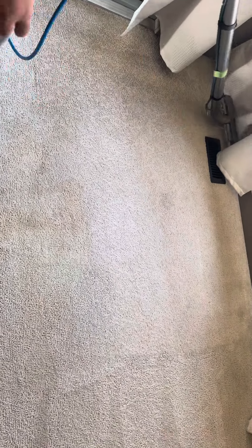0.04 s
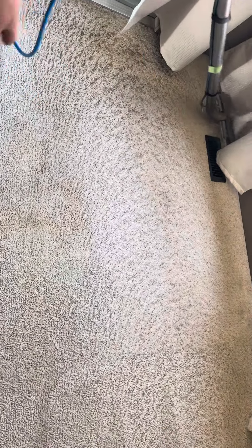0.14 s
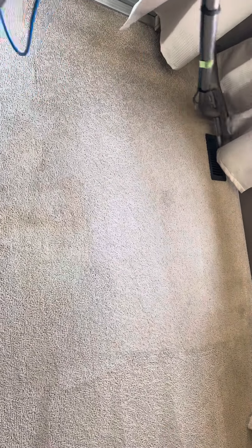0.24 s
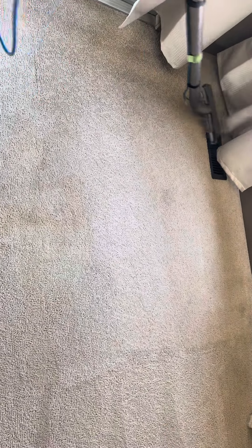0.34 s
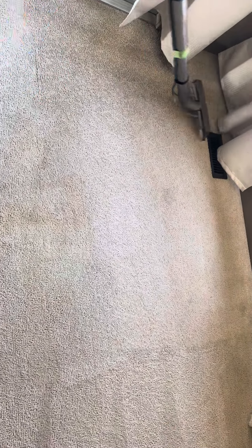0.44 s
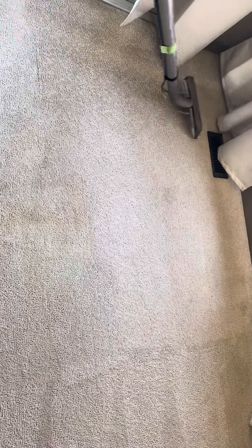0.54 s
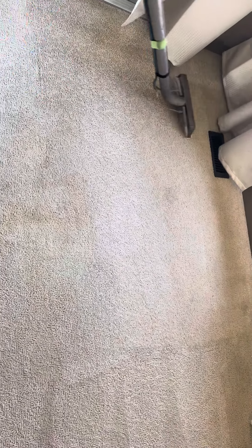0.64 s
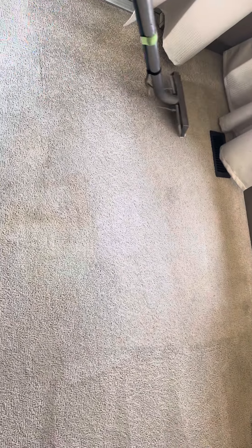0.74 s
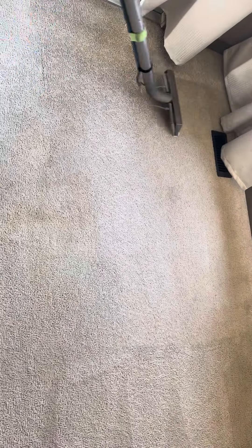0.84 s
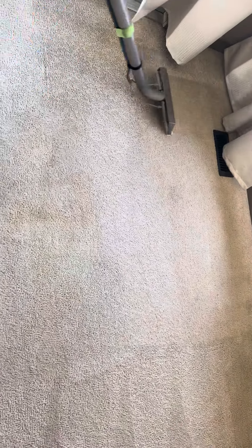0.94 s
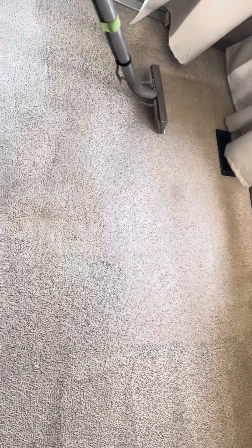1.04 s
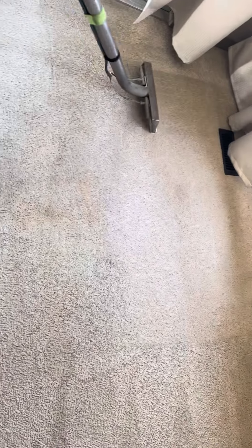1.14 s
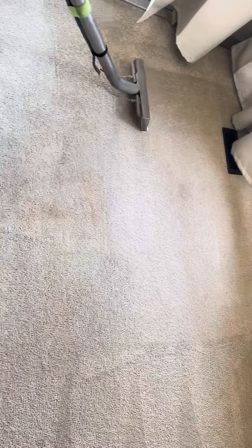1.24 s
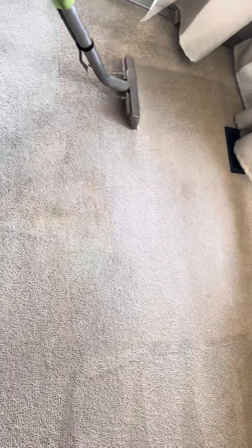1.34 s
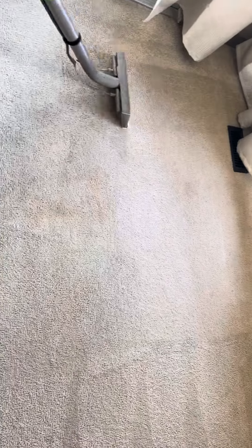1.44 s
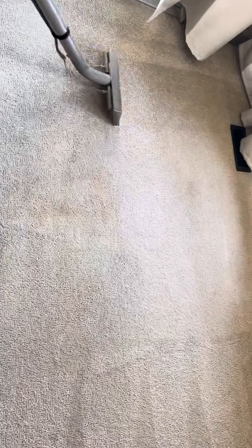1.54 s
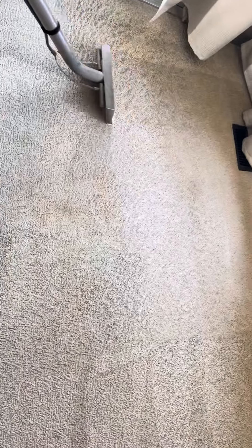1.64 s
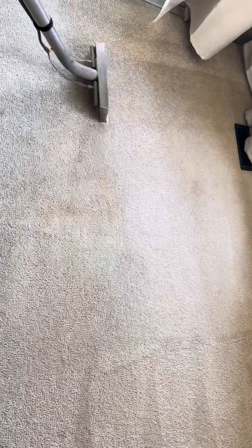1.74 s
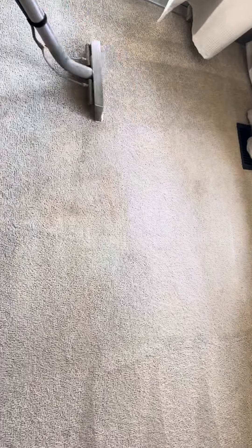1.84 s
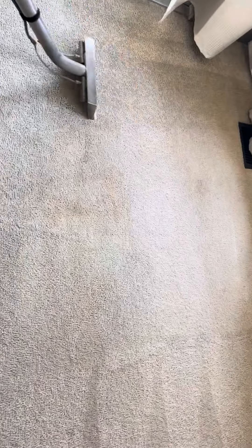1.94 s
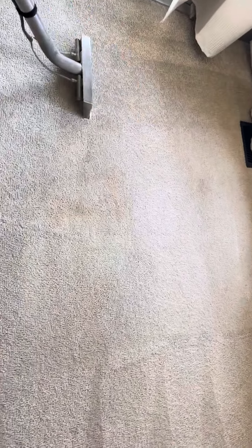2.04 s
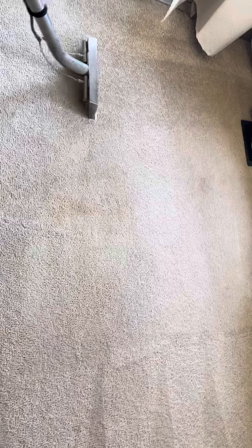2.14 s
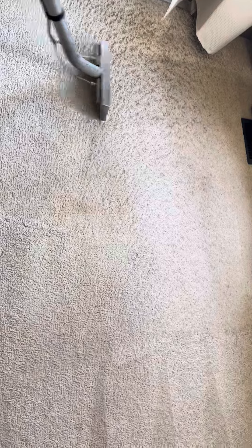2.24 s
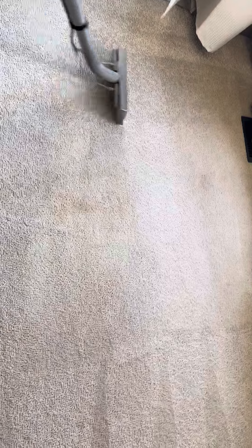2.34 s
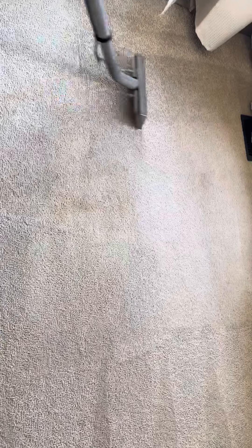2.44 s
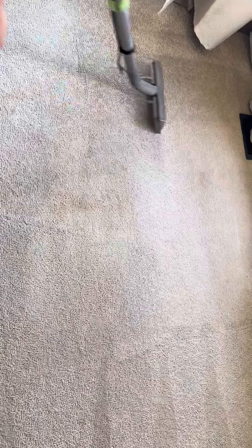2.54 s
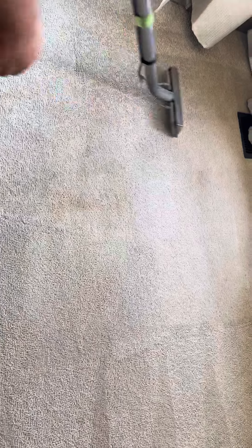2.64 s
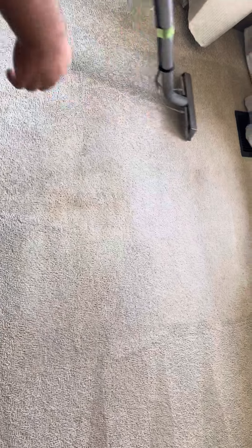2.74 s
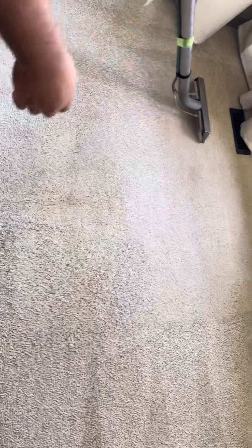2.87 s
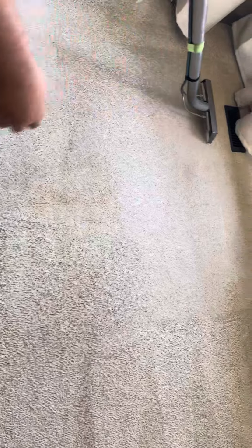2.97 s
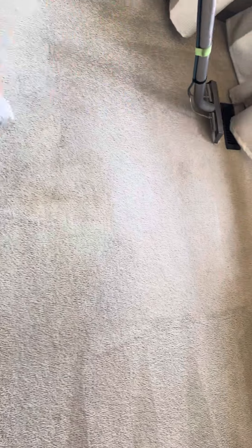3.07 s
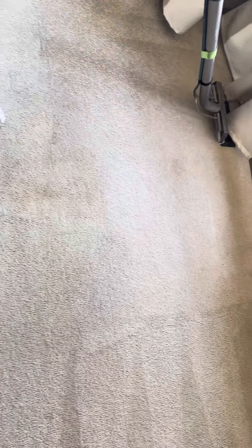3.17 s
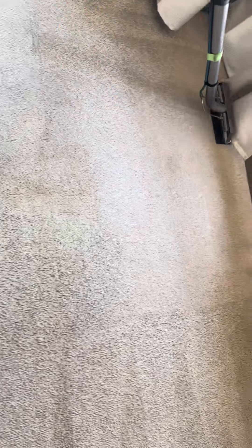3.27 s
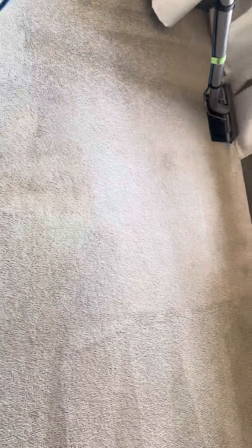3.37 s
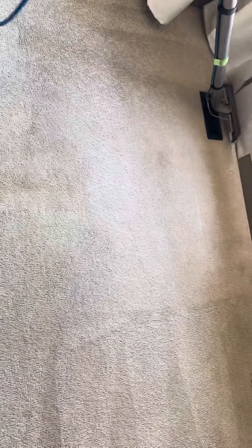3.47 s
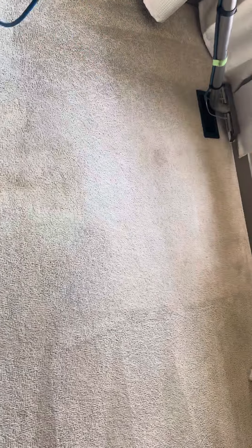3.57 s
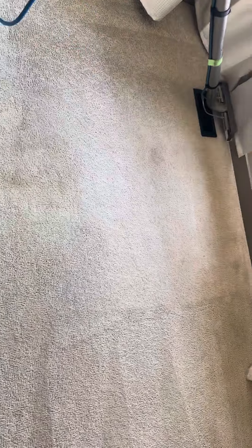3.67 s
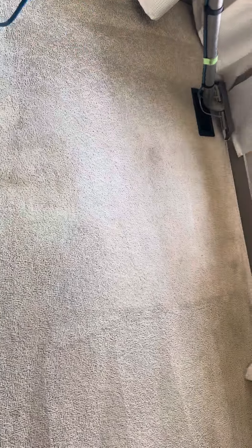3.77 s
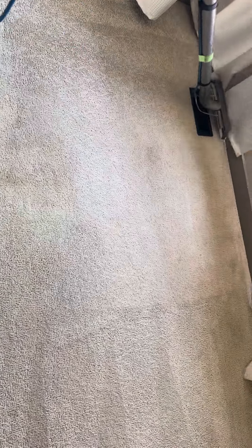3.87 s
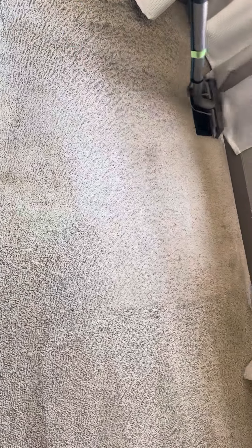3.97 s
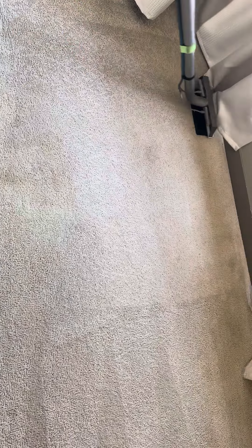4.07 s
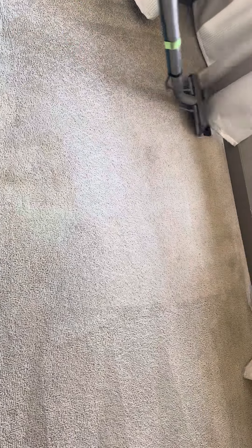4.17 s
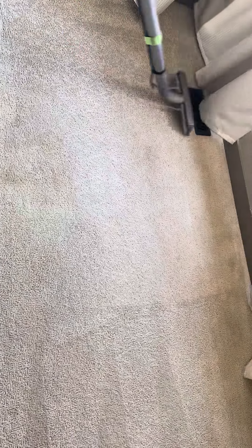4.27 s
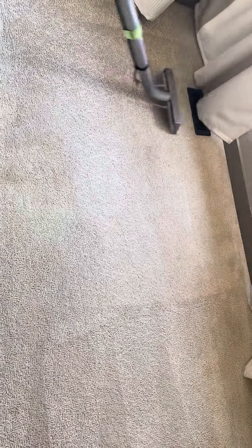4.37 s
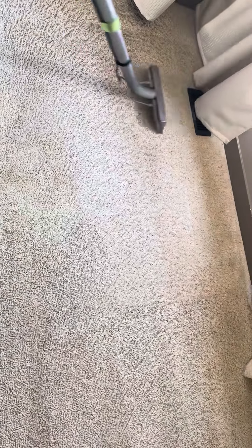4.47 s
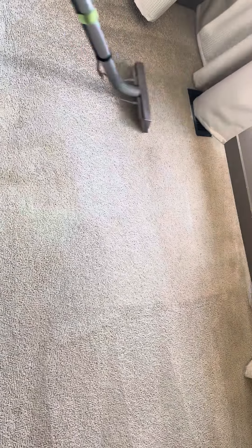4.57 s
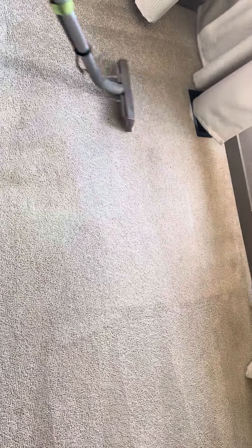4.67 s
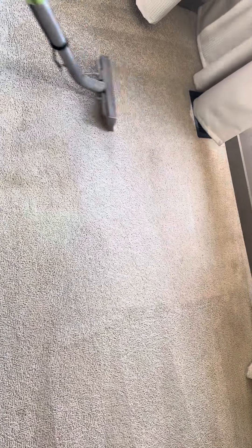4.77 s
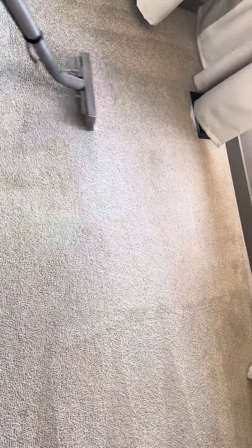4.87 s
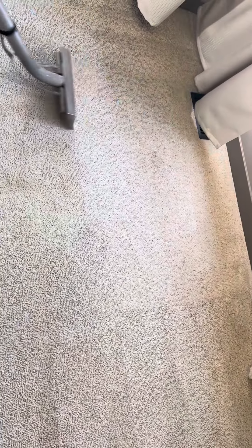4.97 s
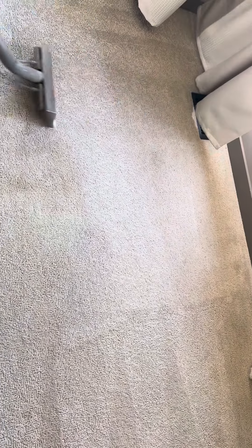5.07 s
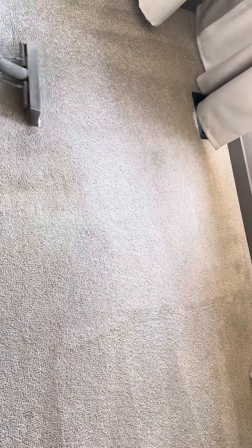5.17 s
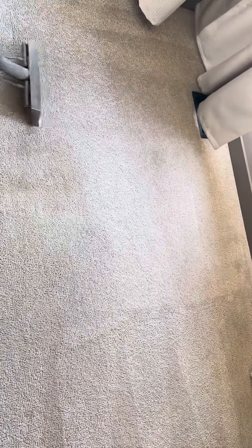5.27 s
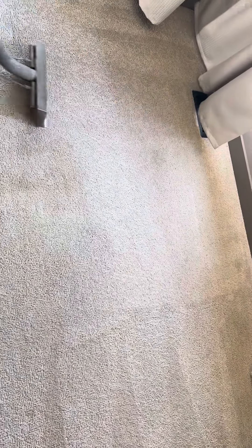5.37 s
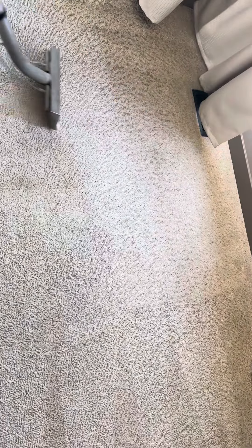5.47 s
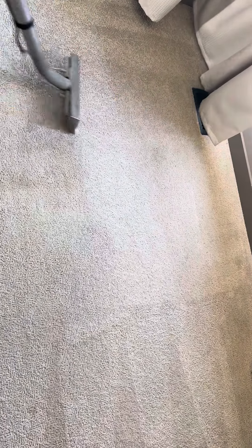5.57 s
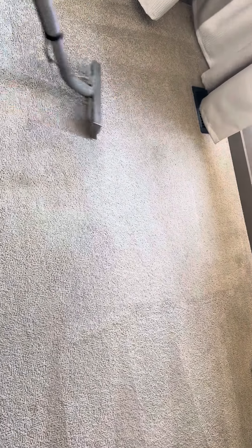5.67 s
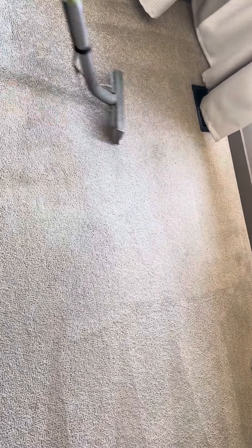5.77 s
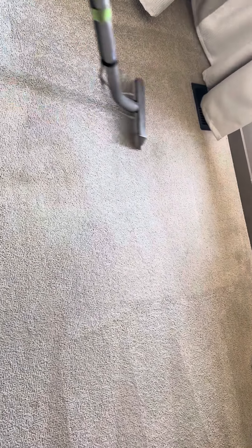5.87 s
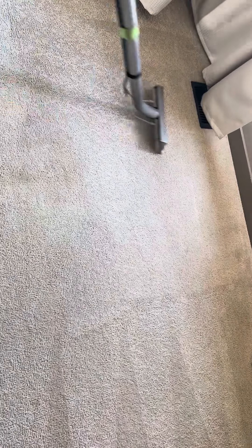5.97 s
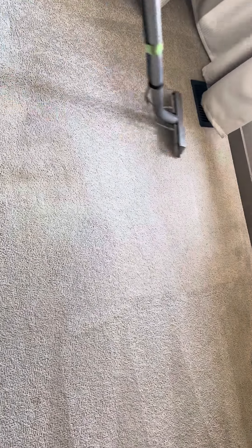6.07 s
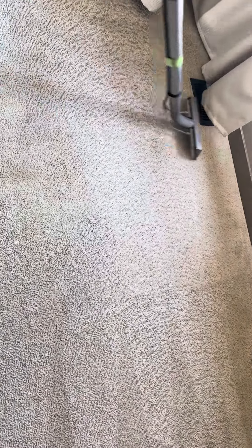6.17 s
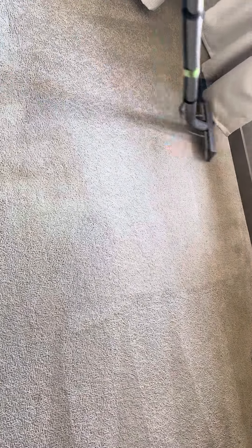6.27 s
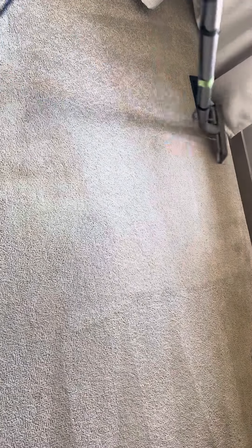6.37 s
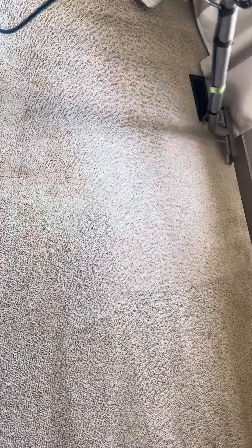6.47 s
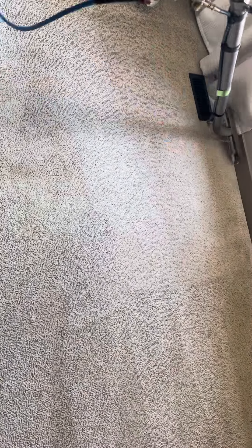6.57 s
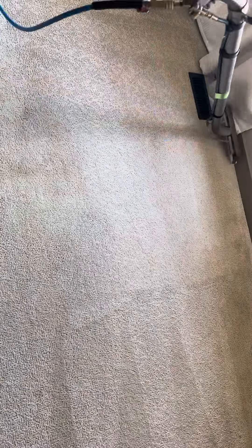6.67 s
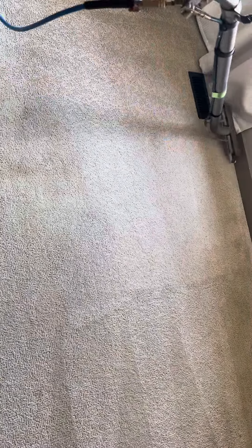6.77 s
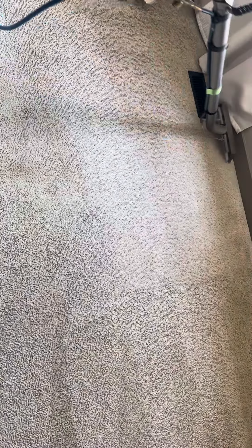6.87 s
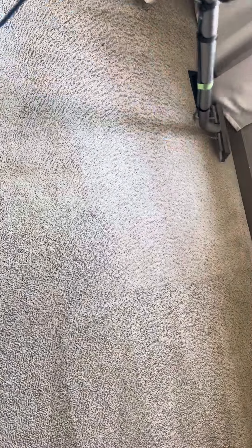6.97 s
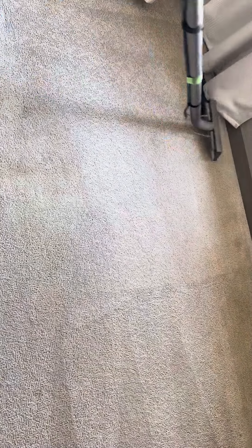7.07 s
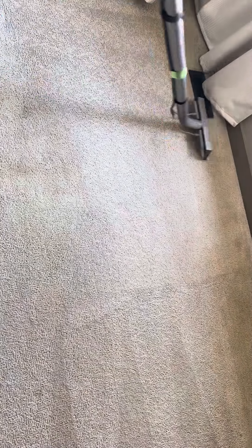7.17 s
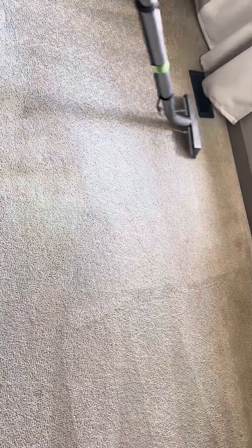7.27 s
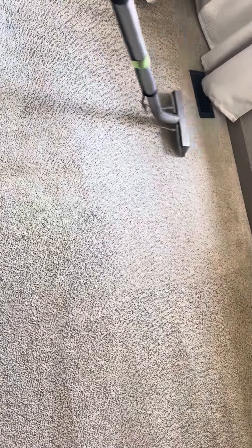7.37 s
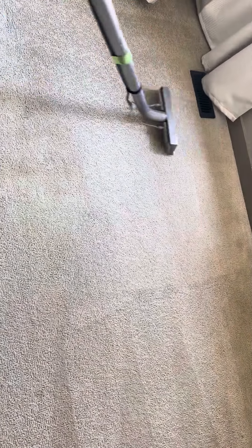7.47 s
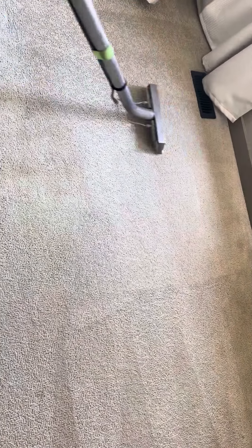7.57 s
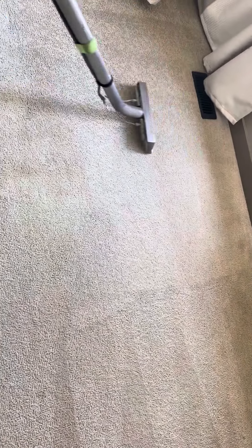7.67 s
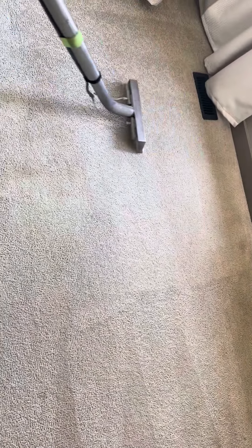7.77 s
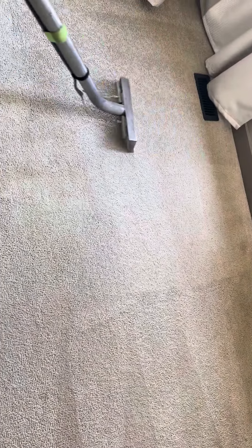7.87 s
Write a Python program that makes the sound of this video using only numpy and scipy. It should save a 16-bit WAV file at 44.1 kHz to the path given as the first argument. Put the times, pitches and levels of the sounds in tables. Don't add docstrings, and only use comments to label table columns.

```python
import sys
import numpy as np
from scipy import signal
from scipy.fft import rfft, irfft, next_fast_len
from scipy.io import wavfile
from scipy.ndimage import uniform_filter1d

SR = 44100
rng = np.random.default_rng(int(sys.argv[2]) if len(sys.argv) > 2 else 0)


def amp(db):
    return 10 ** (np.asarray(db, float) / 20)


def write(x):
    x = np.atleast_2d(x).T
    wavfile.write(sys.argv[1], SR, np.round(np.clip(x, -1, 1) * 32767).astype(np.int16))


N = 349272

# start [s], length [s], level [dB], boom of the hollow head [Hz],
# rasp above the boom [dB].
SCUFFS = [(0.247, 0.138, -30, 274, 2.5), (2.2, .17, -34.5, 350, -10), (2.4, 0.188, -33.5, 180, -5),
          (2.66, 0.21, -40, 190, -6), (3.136, .06, -30, 165, -26), (3.189, 0.098, -21.5, 227, -4),
          (3.293, 0.063, -24.5, 302, -9), (3.527, 0.037, -24, 161, -2), (3.836, 0.083, -34, 249, 4.5),
          (4.036, 0.045, -23.5, 231, -11), (4.074, 0.13, -30.5, 267, 1), (4.208, 0.081, -29, 153, -3),
          (4.505, 0.058, -26.5, 168, -20), (4.854, .2, -28.5, 191, -9), (5.087, 0.13, -27, 156, -16),
          (5.22, .08, -32, 170, -18), (5.616, 0.099, -29, 166, -18), (5.797, 0.19, -31.5, 221, -15),
          (6.259, 0.14, -25.5, 250, -3.5), (6.4, .045, -29, 220, -24), (6.518, 0.052, -24.5, 210, -0.5),
          (6.556, 0.091, -26, 440, 1), (6.999, .19, -31, 235, 1.5), (7.486, .11, -34, 152, -2)]
# time [s], notch where the floor echo cancels the jets [Hz], how far the port sum is
# spared from thinning above 8.2 kHz [dB], nearness [dB].
WAND_POSE = [(0, 12000, -1.5, -3), (.6, 11600, 0, -1.5), (1.1, 14400, -2.5, 0), (1.5, 12500, -3.5, 2),
             (1.9, 11200, -5, 3.5), (2.1, 10950, 4, 4), (3, 12000, 2, -0.5), (3.3, 12000, -2.5, -1.5),
             (3.5, 12000, 5, -1.8), (4, 12500, 4, -3), (4.3, 13500, -5, -3.5), (4.6, 14500, -2.5, -1),
             (5, 12000, -4, 2), (5.5, 13000, -2.5, 3), (5.95, 12600, 0, -.4), (6.8, 12300, 0.3, -1.4),
             (7.3, 12500, -3, -.4), (7.92, 12000, -4, 1.5)]


def evened(x):
    return x / np.sqrt(np.mean(x ** 2) + 1e-20)


def steadied(x):
    power = abs(uniform_filter1d(np.atleast_2d(x).mean(0) ** 2, size=3000))
    return x / np.sqrt(power + 1e-9)


def curve(rows, index):
    rows = np.array(rows)
    return np.interp(np.arange(N) / SR, rows[:, 0], rows[:, index])


def gated(starts, ends, heights, rise_s, fall_s):
    t = np.arange(0, N / SR, 0.001)
    total = np.zeros(len(t))
    for start, end, height in zip(starts, ends, heights):
        full = start + rise_s
        release = max(end, full)
        total += height * np.interp(t, [start, full, release, release + fall_s], [0, 1, 1, 0])
    return np.interp(np.arange(N) / SR, t, total)


def dug(db):
    start, length = np.transpose(SCUFFS)[:2]
    rise_s, ease_s = 0.0094, 0.02
    return gated(start, start + length - ease_s / 2, amp(db), rise_s, ease_s)


def resonate(x, hz, width_hz):
    turn = np.exp(2j * np.pi * np.cumsum(hz) / SR)
    r = np.exp(-np.pi * width_hz / SR)
    return 2 * (turn * signal.lfilter([1 - r], [1, -r], x * turn.conj())).real


def turbulence(colour, patchy_db, flicker_db, size=1024):
    hop = size // 4
    frames, hz = N // hop + 5, np.fft.rfftfreq(size, 1 / SR)
    f, *columns = np.transpose(colour)
    sum_db, diff_db, link = (np.interp(np.log(hz + 1), np.log(f), c, *edge)[:, None]
                             for c, edge in zip(columns, [(-99, -99), (-99, -99), ()]))
    a, b, c, d, patches = np.ascontiguousarray(rng.standard_normal((frames, len(hz), 5)).T)
    patches = uniform_filter1d(patches, size=14, axis=0)
    patches = evened(uniform_filter1d(patches, size=12, axis=1))
    gusts = evened(uniform_filter1d(rng.standard_normal(frames), size=10))
    link = np.clip(link, -1, 1)
    diff = 1j * link * (a + 1j * b) + np.sqrt(1 - link ** 2) * (c + 1j * d)
    z = np.array([(a + 1j * b) * amp(sum_db), diff * amp(diff_db)])
    z = z * amp(patchy_db * patches + flicker_db * gusts)
    mid, side = signal.istft(z, nperseg=size, noverlap=size - hop)[1][:, :N]
    return np.array([mid + side, mid - side]) / np.sqrt(np.mean(mid ** 2))


def spray():
    # frequency [Hz], port sum [dB], port difference [dB],
    # share of the difference that is the delayed sum [-1 to 1].
    jets_colour = [(4200, -22, -20, 0), (5300, -8, -14, -.3), (6000, -1, -11, -.6), (7000, 0, -3, -.8),
                   (7800, 0, -1, -.8), (8500, -4, -2, -.75), (9200, -8, -4, -.8), (10000, -10, -3, -.7),
                   (10600, -16, -2.5, -.6), (13300, -18, -3.5, .5), (14100, -11, -4, .6),
                   (15100, -8.5, -5, .7), (16500, -8, -7, .6)]
    rush_colour = [(935, 4, -15, 0), (1190, -0.5, -2, .1), (1800, 0, -8, .1), (2200, 0.5, 0, -.1),
                   (2840, 1, 3.5, -0.54), (3560, 0.5, -0.5, -.3), (4350, -1.5, 1, -0.25),
                   (4530, 1, 1.5, -0.054), (6130, -4.5, -3.5, -.3), (7750, -18, -13.5, -.5),
                   (12000, -65, -15.5, 0)]
    # start [s], end [s], share shut [0-1].
    trigger_shut = [
        (3.363, 4.015, 0.39),
        (3.41, 4.022, 0.41),
        (3.496, 3.898, 0.08),
        (4.067, 4.163, 0.32),
        (6.598, 6.76, 0.12),
    ]
    # start [s], length [s], level [dB].
    gulps = [
        (0.212, 0.18, 3.5),
        (1.497, 0.054, 1),
        (3.174, 0.16, 3),
        (4.033, 0.043, 1.5),
        (4.157, 0.048, 4),
        (5.12, .04, 0),
        (6.532, .07, 0.5),
        (6.82, 0.053, 2),
        (6.925, .25, 1.7),
    ]
    near_db = curve(WAND_POSE, index=3)
    shut = gated(*np.transpose(trigger_shut), rise_s=0.06, fall_s=0.017)
    start, length, db = np.transpose(gulps)
    fall_s = 0.028
    gulp_db = gated(start, start + length - fall_s / 2, db, 0.025, fall_s)

    jets_db = -29 + near_db - 5 * shut + 0.78 * gulp_db
    jets = amp(jets_db) * turbulence(jets_colour, patchy_db=0.78, flicker_db=0.35)
    whistle = amp(0.1 - 0.63 * near_db - 9.5 * shut) - 1
    whistling = whistle * resonate(jets, np.full(N, 6150.), width_hz=1100)
    echo_notch = 0.25 * resonate(jets, curve(WAND_POSE, index=1), width_hz=1000)
    jets = jets + whistling - echo_notch

    rush_db = -32.56 + 0.3 * near_db - 10 * shut + gulp_db
    return jets + amp(rush_db) * turbulence(rush_colour, patchy_db=1.12, flicker_db=0.47)


def drag():
    # time [s], weight of the head on the pile [dB].
    head_weight = [(0, -33.5), (1.4, -33), (2.1, -34), (2.55, -33), (3.15, -31.5), (3.6, -33.5), (4.1, -33),
                   (4.85, -32.5), (5.25, -35), (5.8, -31.5), (6.4, -32.5), (7.15, -33), (7.92, -32)]
    # frequency [Hz], port sum [dB], port difference [dB],
    # share of the difference that is the delayed sum [-1 to 1].
    scrape_colour = [(150, -2.5, -36, 0), (250, 1, -17.5, -.1), (372, 0.5, -6.5, -.2), (543, -4, -3.5, -.1),
                     (616, -1.5, -1.5, .2), (790, 0, -3, .2), (1020, -4, -3.5, 0), (1480, -11, -14, 0),
                     (2463, -13, -19, 0)]
    rumble_colour = [(20, -42, -72, 0), (35.4, -42, -52, 0), (56, 3, -42, 0), (81, 4, -44, 0),
                     (101, -4.5, -55, 0), (130, 5.5, -44, 0), (198, -4, -14, 0), (281, -8, -15, 0),
                     (441, -32, -25, 0)]
    judder = amp(0.5 * evened(uniform_filter1d(rng.standard_normal(N), size=400)))
    scrape = amp(curve(head_weight, index=1) - 0.58)
    scrape = scrape * turbulence(scrape_colour, patchy_db=1.04, flicker_db=-1.05)
    shaken = amp(-40.5) + dug(np.transpose(SCUFFS)[2] - 17)
    rumble = shaken * turbulence(rumble_colour, patchy_db=2.0, flicker_db=-0.9, size=2048)
    return judder * scrape + rumble


def blower():
    # frequency [Hz], level [dB], wavering width [Hz], steady share [0-1].
    hum_tones = [(59, -48, 13, 0.2), (123, -37, 23, 0.5), (194.7, -41, 9.4, .35), (259, -45, 18, 0),
                 (366.4, -46, 16, 0.2), (535, -54.5, 18, 0.04), (791, -49, 150, 0)]
    held = 0.3
    size = next_fast_len(N)
    t, f, out = np.arange(N) / SR, np.fft.rfftfreq(size, 1 / SR), np.zeros(N)
    flow = rfft(rng.standard_normal(size))
    for hz, db, width_hz, clean in hum_tones:
        smeared = evened(irfft(flow / (1 + (2 * (f - hz) / width_hz) ** 2), size)[:N])
        steady = np.sqrt(2) * np.sin(2 * np.pi * (hz * t + rng.random()))
        tone = evened((1 - clean) * smeared + clean * steady)
        out += amp(db - 2.0) * ((1 - held) * tone + held * steadied(tone))
    return out


def scuffs():
    # frequency [Hz], port sum [dB], port difference [dB],
    # share of the difference that is the delayed sum [-1 to 1].
    rasp_colour = [(250, -36, -25, 0), (447, 4, -1, 0.0047), (590, 0.5, 4, 0.0055), (800, -0.5, -4.5, 0),
                   (1070, 2, 1, 0), (1390, -9.5, -13, 0), (3120, -22, -15, 0)]
    start, length, db, boom_hz, rasp_db = np.transpose(SCUFFS)
    slips = amp(1.6 * evened(uniform_filter1d(rng.standard_normal(N), size=250)))
    hz = np.interp(np.arange(N) / SR, start + length / 2, boom_hz)
    boom = resonate(slips * rng.standard_normal(N), hz, width_hz=120)
    boom = steadied(resonate(boom, hz, width_hz=120))
    rasp = slips * turbulence(rasp_colour, patchy_db=4.0, flicker_db=3.0)
    tube_hz = 760 + 0.3 * (hz - hz.mean())
    rasp = steadied(rasp + resonate(rasp, tube_hz, width_hz=110))
    return dug(db - 4.5) * boom + dug(db + rasp_db - 4.0) * rasp


def bumps():
    # time [s], peak [dB], thud [Hz], t60 [s], knock above the thud [dB].
    head_bumps = [(0.404, -16, 151, 0.1, -16), (0.474, -25, 131, 0.11, -16), (3.144, -17, 130, 0.1, -28),
                  (3.204, -15, 80.7, 0.09, -13), (3.532, -17.5, 164, 0.073, -6),
                  (3.88, -29, 117, 0.065, -5), (3.552, -19, 150, .07, -7), (4.209, -18, 116, 0.055, -11),
                  (4.228, -19, 100, .08, -16), (4.961, -26.5, 125, .2, -20), (5.061, -23, 121, .2, -18),
                  (6.261, -13.5, 250, 0.097, -21), (6.523, -12.5, 235, 0.066, -7),
                  (6.548, -17, 135, 0.1, -8)]
    t, out = np.arange(8000) / SR, np.zeros((2, N + 8000))
    knock_band = signal.butter(2, [250, 1500], "band", fs=SR, output="sos")
    knocks = signal.sosfilt(knock_band, rng.standard_normal((len(head_bumps), 3, len(t))))
    for (s, db, hz, t60_s, knock_db), knock in zip(head_bumps, knocks):
        thud = np.sin(2 * np.pi * hz * t * (1 - 2.9 * t))
        thud = thud * amp(-60 * t / t60_s) * (1 - np.exp(-t / 0.005))
        knock = evened(knock[0] + 0.7 * knock[1:])
        knock = knock * amp(knock_db - 60 * t / 0.06)
        out[:, round(s * SR):][:, :len(t)] += amp(db) * (thud + knock)
    return out[:, :N]


def scene():
    return spray() + drag() + scuffs() + blower() + bumps()


def masked(x, margin_db, unsure_db, hole_db):
    size, overlap = 2048, 1536
    hz, t, z = signal.stft([x[0] + x[1], x[0] - x[1]], SR, nperseg=size, noverlap=overlap)
    band = np.where(hz < 6890, hz // 345, 10 + hz // 689).astype(int)
    power = uniform_filter1d(abs(z) ** 2, size=4, axis=2)
    starts, widths = np.unique(band, return_index=True, return_counts=True)[1:]
    level = np.add.reduceat(power, starts, axis=1) / widths[:, None] + 1e-20
    luck = evened(uniform_filter1d(rng.standard_normal(level.shape), size=5, axis=2))[:, band]
    top = hz[:, None] > 8200
    under_db = 10 * np.log10(level[::-1] / level)[:, band] + unsure_db * (1 + top) * luck
    under_db[0] -= np.interp(t, *np.transpose(WAND_POSE)[[0, 2]]) * top
    loudest = np.sqrt(level * np.maximum(level, level[::-1]))[:, band]
    above_hole = uniform_filter1d(power, size=3, axis=1) > loudest * amp(-2 * hole_db)
    kept = (under_db < margin_db) & above_hole
    z = z * (kept | (hz[:, None] < 1700))
    mid, side = signal.istft(z, SR, nperseg=size, noverlap=overlap)[1][:, :N]
    return np.array([mid + side, mid - side]) / 2


def top_cut(x):
    return signal.sosfilt(signal.butter(12, 17100, fs=SR, output="sos"), x)


def record(dry):
    cut = signal.sosfilt(signal.butter(3, 33, "high", fs=SR, output="sos"), dry)
    lowpass = signal.firwin(1023, 15730, window=("kaiser", 10), fs=SR)
    limited = signal.oaconvolve(cut, lowpass[None], "same")
    thinned = masked(limited, margin_db=7.5, unsure_db=1.8, hole_db=3.6)
    return top_cut(thinned)


dry = scene()
out = record(dry)
write(out)
```